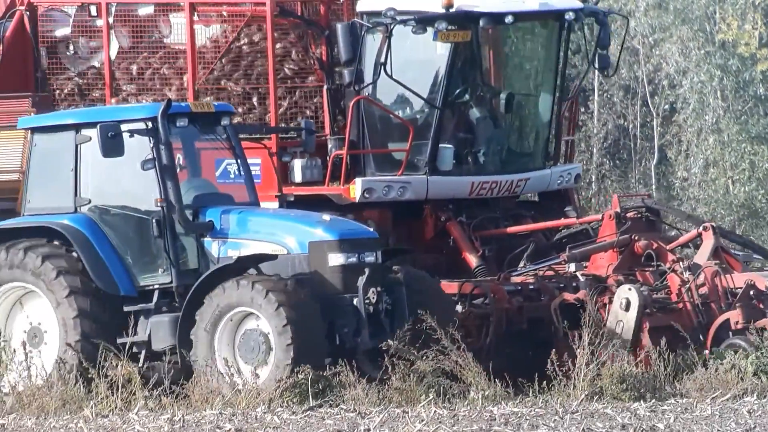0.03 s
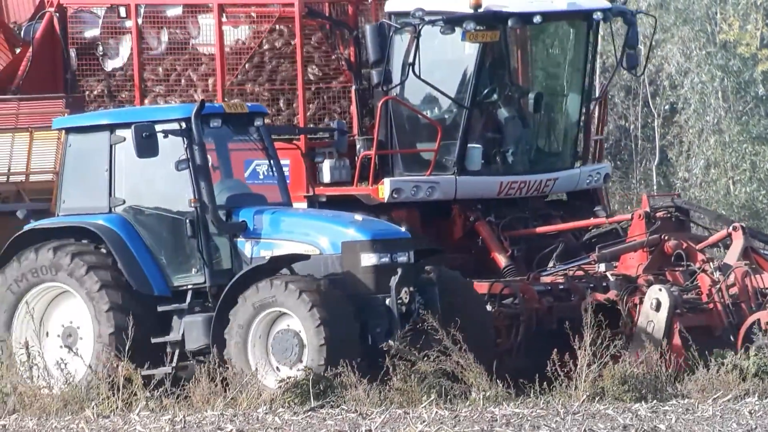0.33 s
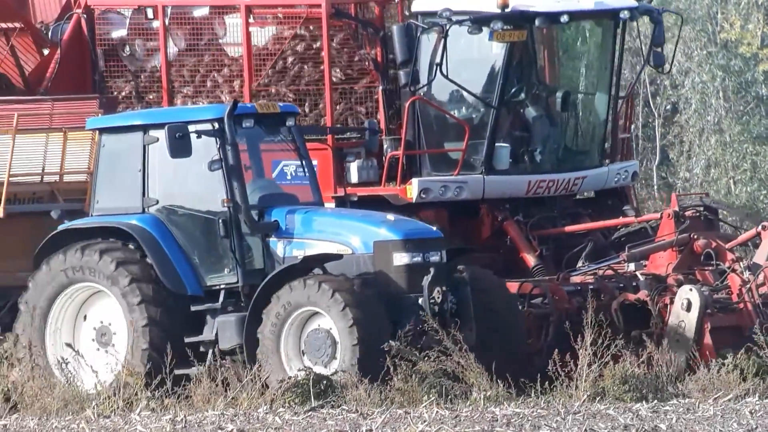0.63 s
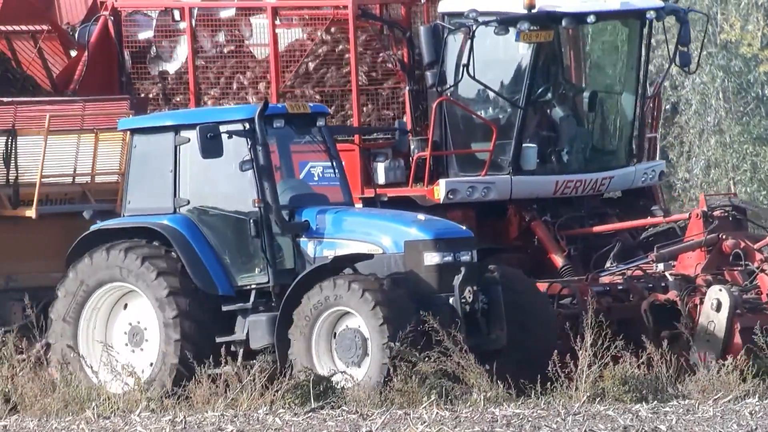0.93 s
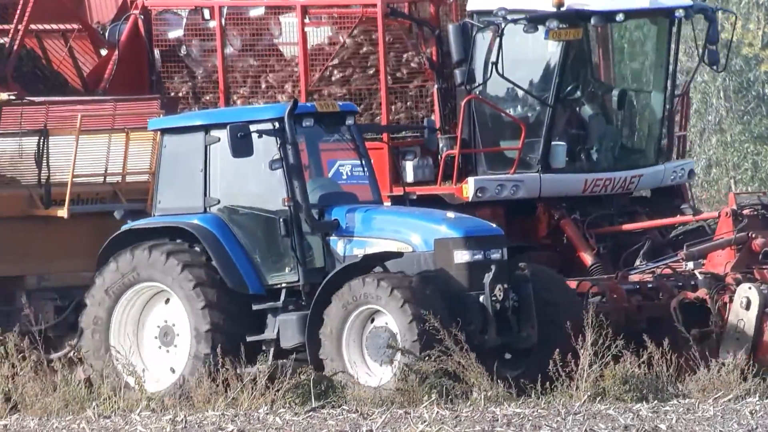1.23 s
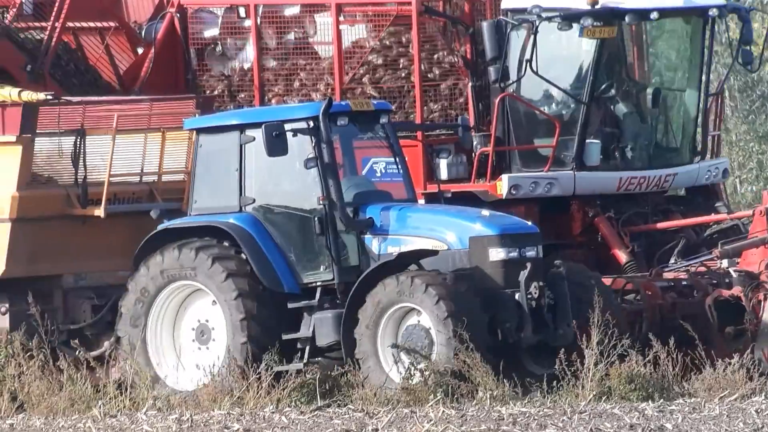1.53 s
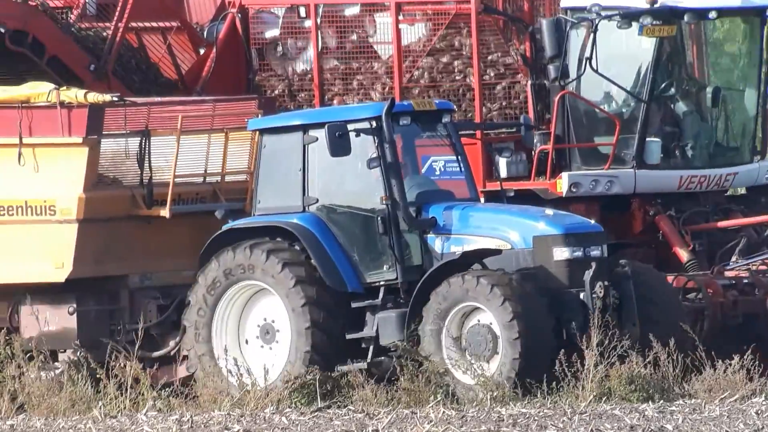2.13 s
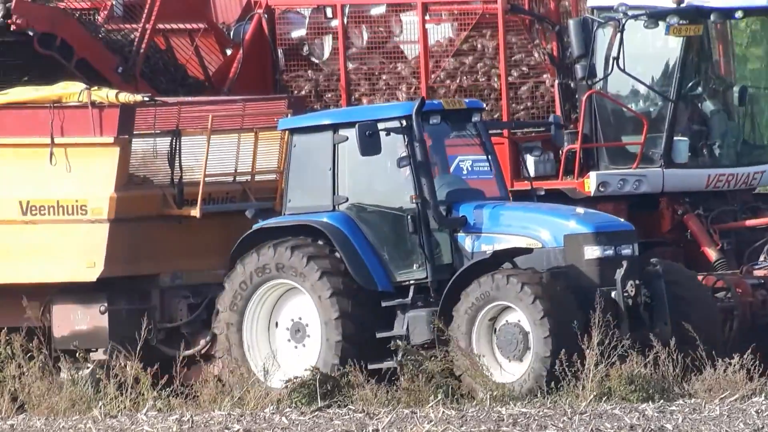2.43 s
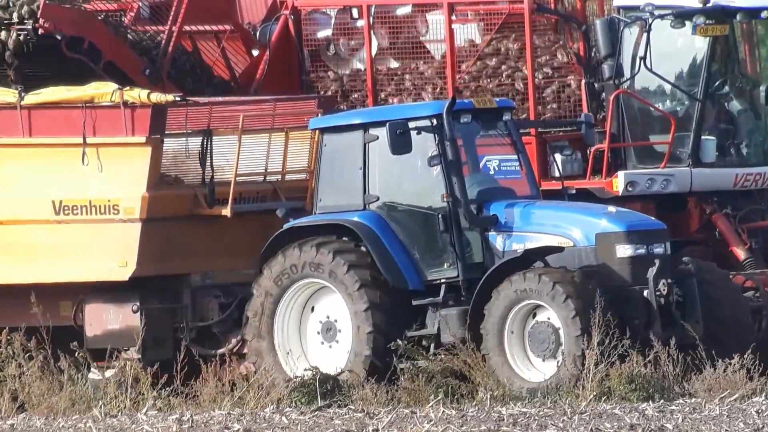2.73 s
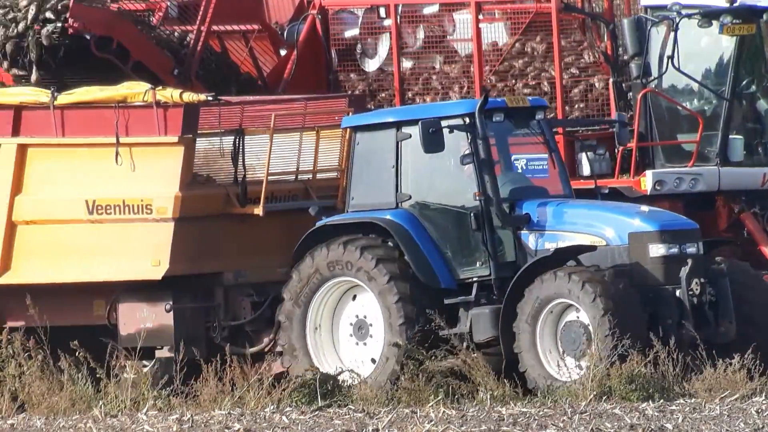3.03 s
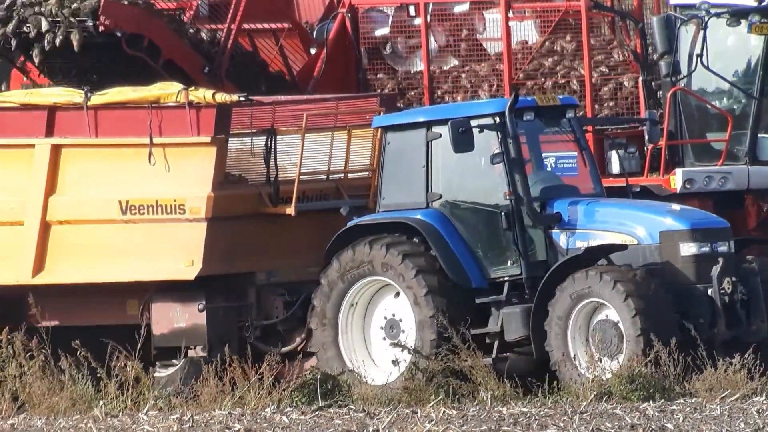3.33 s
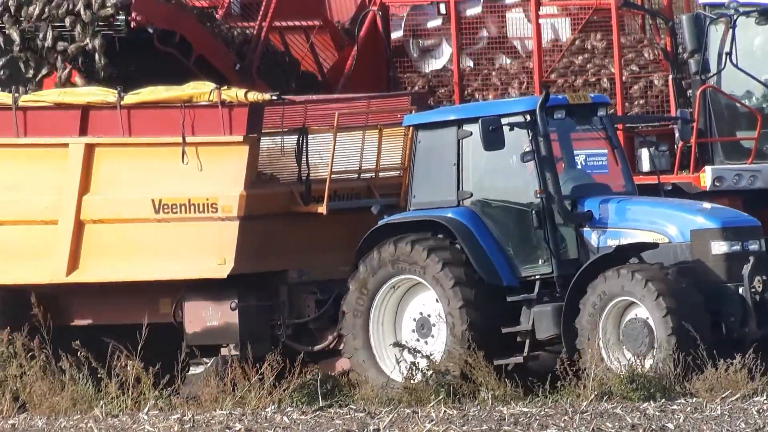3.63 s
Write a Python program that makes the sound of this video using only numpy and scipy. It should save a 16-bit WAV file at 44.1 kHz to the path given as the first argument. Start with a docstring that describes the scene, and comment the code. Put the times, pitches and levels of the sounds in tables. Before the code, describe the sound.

A tractor and a harvester drone steadily some way off in a field, their diesel clatter mixed with wavering whines and occasional light steel clanks. Close up, gusts hit the microphone with irregular low thumps throughout.

```python
"""A tractor and a beet harvester crawl side by side across a field, some way off.
Their clatter is amplitude-modulated by diesel firings and conveyor chains, and blends with wavering
resonant whines into one drone, with the scrape of the crop, a few steel clanks and one reflection.
Close up, gusts buffet the microphone: every eddy is one low thump with a short ragged wake."""
import sys
import numpy as np
from scipy.fft import rfft, irfft, next_fast_len
from scipy.io import wavfile
from scipy.ndimage import map_coordinates

SR = 44100
rng = np.random.default_rng(int(sys.argv[2]) if len(sys.argv) > 2 else 0)


def bounce(signal):
    """Save signal as a 16-bit WAV file at the path given by the first command-line argument."""
    frames = np.transpose(np.atleast_2d(signal))
    limited = np.clip(frames, -1, 1)
    pcm = np.round(limited * 32767).astype(np.int16)
    wavfile.write(sys.argv[1], SR, pcm)


N = 163170

# spectrum of the microphone's hiss (frequency [Hz], relative level [dB])
HISS_SPECTRUM = [(100, 4.5), (6000, -1.5), (8600, 3), (9200, -3.5), (15500, -5.5)]
# eddies that hit the microphone (time [s], peak level [dB], pitch [Hz], fall time [ms])
EDDY_HITS = [(0.137, -7, 184, 3), (0.194, -15, 152, 3.8), (.216, -14, 179.3, 7.4), (.27, -14, 135.8, 7.2),
             (0.304, -14.5, 144, 4), (0.321, -12, 284, 2), (.535, -4.5, 196.6, 2.5),
             (.551, -8.5, 152.5, 7.1), (0.625, -11.5, 190.2, 8), (0.653, -12, 199.4, 4),
             (0.73, -3.5, 194.3, 3.2), (.827, -11.5, 170, 3.4), (0.846, -15, 149, 5.7),
             (0.923, -2.5, 159.7, 4.2), (.989, -14.5, 250, 3.7), (0.997, -9, 255, 2.7),
             (1.045, -10.5, 182, 5.4), (1.123, -6, 255, 1.34), (1.131, -7.5, 126.1, 12.6),
             (1.219, -5.5, 156, 2.6), (1.247, -15.5, 123.4, 8.7), (1.293, -18.5, 153.8, 8.4),
             (1.362, -10, 154, 2.8), (1.373, -16, 420, 2.9), (1.376, -0.5, 162.2, 2.74),
             (1.393, -10, 202, 2.9), (1.479, -14.5, 178.6, 2.1), (1.534, -8.5, 152.8, 6.4),
             (1.623, -10.5, 166, 9.9), (1.64, -10, 229.3, 3.4), (1.711, -18, 148, 13.5),
             (1.954, -19, 152.6, 2.6), (1.982, -20.5, 141.6, 3.4), (2.165, -9, 148.8, 2.44),
             (2.192, -17, 174, 8.8), (2.246, -15.5, 168, 8.1), (2.335, -18.5, 135.8, 16),
             (2.363, -11.5, 215, 3.8), (2.443, -11.5, 210, 4), (2.475, -5.5, 154.5, 3.8),
             (2.547, -9, 147, 6.8), (2.594, -7.5, 165.3, 2), (2.61, -9, 145, 4.1), (2.708, -5, 142.7, 5.6),
             (2.729, -13, 166.3, 3.1), (2.788, -15, 178, 3.8), (2.8, -9, 144, 9.5), (2.929, -16, 152, 4.3),
             (3.025, -9, 124, 9.9), (3.032, -11.5, 276, 1.6), (3.047, -4, 224.7, 2.17),
             (3.088, -7.5, 147, 6.3), (3.132, -16.5, 165.4, 8), (3.159, -11.5, 173.5, 6.3),
             (3.182, -11, 172.6, 2.2), (3.439, -16, 116.8, 3.7)]
# turbulence between the eddies (time [s], level [dB])
BREEZE_LEVEL = [(0, -38), (.2, -25.5), (.44, -32), (.5, -36), (.8, -34), (.95, -29), (1.3, -31),
                (1.68, -28.5), (1.8, -38.5), (1.92, -42), (1.96, -33.5), (2.08, -35.5), (2.28, -34.5),
                (2.4, -23.5), (2.65, -31), (2.85, -29.5), (3.15, -30.5), (3.25, -37.5), (3.4, -36),
                (3.7, -41)]
# spectrum of the turbulence (frequency [Hz], relative level [dB])
TURBULENCE_SPECTRUM = [(20, -30), (40, -12.5), (65, 2.5), (110, 7.5), (170, -3), (260, -3), (400, -18.5),
                       (600, -46), (1200, -84.5)]
# spectrum of the rough air behind an eddy (frequency [Hz], relative level [dB])
RASP_SPECTRUM = [(120, -26), (240, 1.5), (320, 0.5), (410, -1), (500, -12), (700, -19), (1200, -45),
                 (3000, -120)]
# clinks of small steel parts (time [s], level [dB], pitch [Hz])
CLINK_HITS = [(1.795, -50, 4600), (2.045, -52, 4180), (2.571, -40, 4040), (2.935, -54, 4380)]
# steel clanks in the harvester (time [s], level [dB], lowest mode [Hz])
CLANK_HITS = [(0.389, -38, 1540), (.638, -35.5, 1544), (.975, -41, 2050), (1.165, -41, 1875),
              (1.337, -39, 2060), (1.42, -39, 1646), (1.897, -36, 1393), (2.315, -42, 2735),
              (2.506, -36.5, 2047), (2.645, -39, 2090), (2.961, -39, 1636), (3.238, -43.5, 2120)]
# modes of the loose steel (frequency [multiple of the lowest mode], relative level [dB])
STEEL_MODES = [(1, -0.5), (1.53, -11.5), (1.94, -16.5)]
# soil and beets scraping through the harvester (time [s], level [dB])
SCRAPE_LEVEL = [(0, -67), (.35, -68), (.7, -61.5), (1.05, -67.5), (1.5, -63.5), (1.75, -63), (2.35, -67.5),
                (2.48, -60.5), (2.64, -59), (2.73, -60.5), (2.92, -58), (3.38, -68.5), (3.7, -65)]
# spectrum of that scraping (frequency [Hz], relative level [dB])
SCRAPE_SPECTRUM = [(1500, -17), (2700, -2), (3500, 7), (3870, -1), (4150, 4), (4700, -4), (5500, -8),
                   (6500, -17), (9000, -35)]
# the harvester's main whine (time [s], level [dB])
DRIVE_LEVEL = [(.1, -67), (.25, -58.5), (.72, -62.5), (.95, -57.5), (1.2, -55), (1.55, -58.5), (1.88, -51),
               (2.15, -61.5), (2.52, -52.5), (2.78, -62.5), (3.2, -49), (3.38, -55.5), (3.7, -61)]
# slow and fast conveyor chain (rattle rate [Hz], modulation depth [fraction])
CONVEYOR_CHAINS = [(22, 0.041), (28.3, 0.13)]
# ringing panels and whining drives (frequency [Hz], width [Hz], level at mean loudness [dB])
RESONANCES = [(606.7, 15, -64), (908.7, 5.8, -63), (1263, 20, -72.5), (1490, 8.7, -71), (1911, 22, -63),
              (2100, 95, -68), (2290, 12, -75), (2750, 29, -74), (3514, 12, -75)]
# exhaust hum (frequency [multiple of the firing rate], level [dB])
EXHAUST_HARMONICS = [(1, -51), (2, -52.5), (3, -67.5)]
# loudness contour shared by clatter and resonances (time [s], relative level [dB])
MACHINE_LEVEL = [(0, -46), (.2, -45), (.42, -43), (.75, -43), (1.15, -42), (1.55, -44), (1.88, -43.5),
                 (2.2, -43), (2.58, -42), (2.85, -45), (3.18, -43), (3.4, -46), (3.6, -46.5), (3.7, -45.5)]
# spectrum of the diesel and conveyor clatter (frequency [Hz], relative level [dB])
CLATTER_SPECTRUM = [(150, 1), (400, -8.5), (540, -9), (880, -3), (1040, -7), (1270, -0.5), (1550, 0),
                    (1720, -1.5), (2100, 1.5), (2350, -6), (2700, -5.5), (3300, -12), (3850, -16),
                    (5000, -26.5), (6500, -38.5), (9000, -58)]

TIME = np.arange(N) / SR


def amp(db):
    """Decibels to amplitude ratio."""
    return 10 ** (np.asarray(db) / 20)


def unit(x):
    """Normalisation to rms 1."""
    return x / np.sqrt(np.mean(x ** 2) + 1e-20)


def curve(rows):
    """Linear interpolation of (time [s], value) points."""
    return np.interp(TIME, *np.transpose(rows))


def wobble(rate_hz):
    """Smooth random modulation: a spline through rate_hz random knots a second."""
    return map_coordinates(rng.standard_normal(4096), [TIME * rate_hz], mode="wrap")


def filtered(x, response):
    """Linear filtering: the spectrum of x times a frequency response."""
    size = next_fast_len(N + SR // 2)
    return irfft(rfft(x, size) * response(np.fft.rfftfreq(size, 1 / SR)), size)[:N]


def noise(spectrum):
    """Spectral shaping of white noise by (frequency [Hz], level [dB]) points, rms 1."""
    points_hz, db = np.transpose(spectrum)
    white = rng.standard_normal(N)
    return unit(filtered(white, lambda hz: amp(np.interp(np.log(hz + 1), np.log(points_hz), db))))


def ringing(centre_hz, width_hz):
    """Forced vibration of a resonance driven by noise, rms 1."""
    white = rng.standard_normal(N)
    return unit(filtered(white, lambda hz: 1 / (1 + 2 * ((hz - centre_hz) / width_hz) ** 2)))


def shaft_phase(rate_hz, drift):
    """Phase as the integral of a shaft's slightly wandering speed."""
    speed_hz = rate_hz * (1 + drift * wobble(6.04))
    return 2 * np.pi * (np.cumsum(speed_hz) / SR + rng.random())


def wake_power(at, db, rise_s, fall_s):
    """Exponential growth and decay of turbulent power around one eddy."""
    time_constants = np.maximum((TIME - at) / fall_s, (at - TIME) / rise_s)
    return amp(db) ** 2 * np.exp(-2 * np.minimum(time_constants, 20))


def turbulence():
    """Incoherent sources add in power: a low, fluttering breeze plus the wake of every eddy."""
    wakes = sum(wake_power(at, db - 20, rise_s=.007, fall_s=.013) for at, db, _, _ in EDDY_HITS)
    breeze = amp(curve(BREEZE_LEVEL) + 2 * wobble(40))
    return np.sqrt(wakes + breeze ** 2) * noise(TURBULENCE_SPECTRUM)


def rasp(db_per_hz=.081):
    """Fine-scale turbulence trails each eddy, louder after the small, high-pitched ones."""
    power = np.zeros(N)
    mean_hz = np.mean(EDDY_HITS, axis=0)[2]
    for at, db, hz, _ in EDDY_HITS:
        rasp_db = db - 25 + db_per_hz * (hz - mean_hz)
        power += wake_power(at, rasp_db, rise_s=.003, fall_s=.0087)
    return np.sqrt(power) * noise(RASP_SPECTRUM)


def eddies(rise_share=.4, pitch_sag=.22, steepening=.44, bass_cut_hz=50):
    """Pressure pulses of sinking pitch; nonlinear steepening gives strong ones a second harmonic."""
    out = np.zeros(N)
    ragged_rad = .5 * wobble(170)
    phases = 2 * np.pi * rng.random(len(EDDY_HITS))
    for (at, db, hz, fall_ms), phase in zip(EDDY_HITS, phases):
        fall_s = fall_ms / 1000
        near = abs(TIME - at) < 20 * fall_s
        age = (TIME[near] - at) / fall_s  # in fall times
        swell = 1 / (np.exp(-age / rise_share) + np.exp(age))
        swell = amp(db) * swell / swell.max()
        cycles = hz * fall_s * (age - pitch_sag * np.log(np.cosh(age)))
        angle = 2 * np.pi * cycles + phase + ragged_rad[near]
        front = steepening * swell ** 2 / (1 + np.exp(2 * age))
        out[near] += swell * np.cos(angle) + front * np.sin(2 * angle)
    return filtered(out, lambda hz: 1 / np.sqrt(1 + (bass_cut_hz / (hz + 1)) ** 6))


def squeak(peak_s=2.56, half_width_s=.07):
    """Friction excites a thin, high resonance of metal that swells and fades."""
    swell = np.exp(-((TIME - peak_s) / half_width_s) ** 2)
    return amp(-76) * swell * ringing(centre_hz=6400, width_hz=280)


def impact(t, rise_s, fall_s):
    """Envelope of a damped vibration t seconds after a blow."""
    return (1 - np.exp(-t / rise_s)) * np.exp(-t / fall_s)


def clinks(split_hz=190):
    """Beating between two close modes as small steel parts snap together."""
    out = np.zeros(N)
    for at, db, hz in CLINK_HITS:
        t = np.maximum(TIME - at, 0)
        pair = np.sin(2 * np.pi * hz * t) + .5 * np.sin(2 * np.pi * (hz + split_hz) * t)
        out += amp(db) * impact(t, rise_s=.0006, fall_s=.005) * pair
    return out


def clanks(rise_s=.0015, fall_s=.0097):
    """Impact excitation of loose steel: a burst of clatter and damped, rattling inharmonic modes."""
    out = np.zeros(N)
    crash = noise(CLATTER_SPECTRUM)
    rattles_rad = [1.3 * wobble(330) for _ in STEEL_MODES]
    for at, db, hz in CLANK_HITS:
        near = (TIME > at) & (TIME < at + 10 * fall_s)
        t = TIME[near] - at
        ring = sum(amp(mode_db) * np.sin(2 * np.pi * hz * ratio * t + rattle[near])
                   for (ratio, mode_db), rattle in zip(STEEL_MODES, rattles_rad))
        out[near] += amp(db) * impact(t, rise_s, fall_s) * (crash[near] + ring)
    return out


def scrape():
    """Friction noise of the crop on the conveyors, surging at the rate of the faster chain."""
    fast_chain_hz = CONVEYOR_CHAINS[1][0]
    surge = 1 + .27 * np.cos(shaft_phase(fast_chain_hz, drift=.01))
    grit_db = 1.5 * wobble(70) + .91 * wobble(12)
    return amp(curve(SCRAPE_LEVEL) + grit_db) * surge * noise(SCRAPE_SPECTRUM)


def drive(pitch_hz=2054, shake_hz=40.2):
    """The harvester's main whine: a frequency-modulated tone and noisy ring that swell with the load."""
    shaky_hz = pitch_hz + shake_hz * wobble(110)
    tone = np.sqrt(2) * np.sin(2 * np.pi * np.cumsum(shaky_hz) / SR)
    ring = 1.5 * ringing(pitch_hz, width_hz=77)
    return amp(curve(DRIVE_LEVEL)) * unit(tone + ring)


def exhaust(firing_phase):
    """Periodic diesel firings make a harmonic hum; each harmonic wavers in level."""
    return sum(amp(db + .83 * wobble(20)) * np.sqrt(2) * np.sin(harmonic * firing_phase)
               for harmonic, db in EXHAUST_HARMONICS)


def machines(firing_hz=119.6, knock_depth=.081, rattle_db=.64):
    """Amplitude modulation of clatter and whines by firings and chains, over the exhaust hum."""
    firing_phase = shaft_phase(firing_hz, drift=.00826)
    shake = amp(rattle_db * wobble(56)) * (1 + knock_depth * np.cos(firing_phase))
    for rate_hz, depth in CONVEYOR_CHAINS:
        shake *= 1 + depth * np.cos(shaft_phase(rate_hz, drift=.028))
    level_db = curve(MACHINE_LEVEL)
    clatter = amp(level_db - 1.63) * noise(CLATTER_SPECTRUM)
    whines = sum(amp(db) * ringing(hz, width_hz) for hz, width_hz, db in RESONANCES)
    whines *= amp(level_db - level_db.mean())
    return unit(shake) * (clatter + whines) + exhaust(firing_phase)


def scene(reflection_gain=.27, delay_s=.00931):
    """Superposition of the distant machines, comb-filtered by one reflection, and the close wind."""
    far = machines() + drive() + scrape() + clanks() + clinks() + squeak()
    far = filtered(far, lambda hz: 1 + reflection_gain * np.exp(-2j * np.pi * hz * delay_s))
    return (far + eddies() + rasp() + turbulence())[None]


def record(dry, band_limit_hz=15750):
    """Self-noise and finite bandwidth: the microphone adds faint hiss and loses the highest treble."""
    hiss = amp(-74) * noise(HISS_SPECTRUM)
    return filtered(dry[0] + hiss, lambda hz: hz < band_limit_hz)[None]


dry = scene()
out = record(dry)
bounce(out)
```